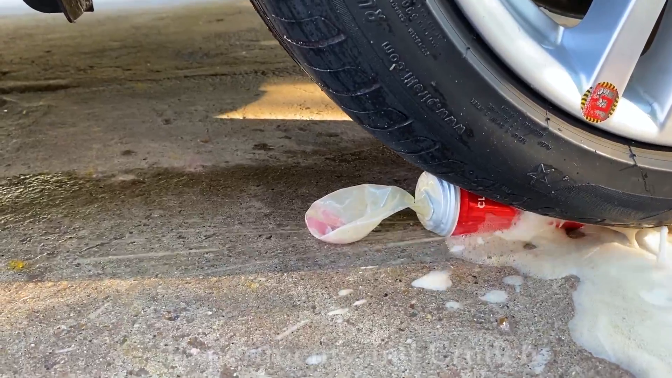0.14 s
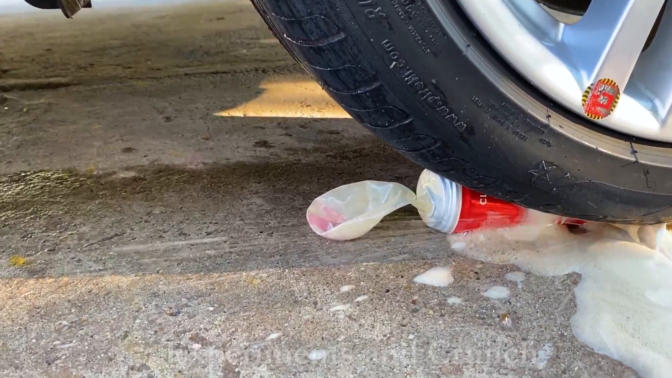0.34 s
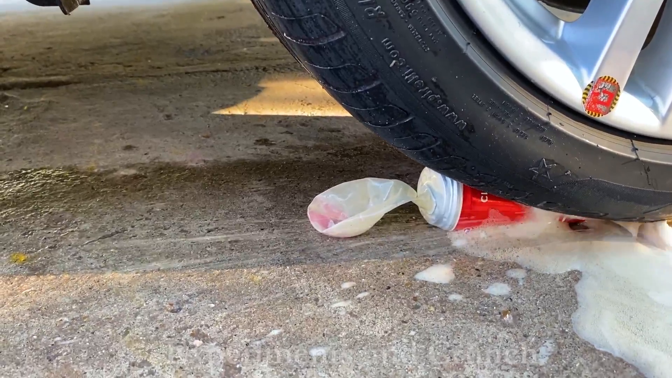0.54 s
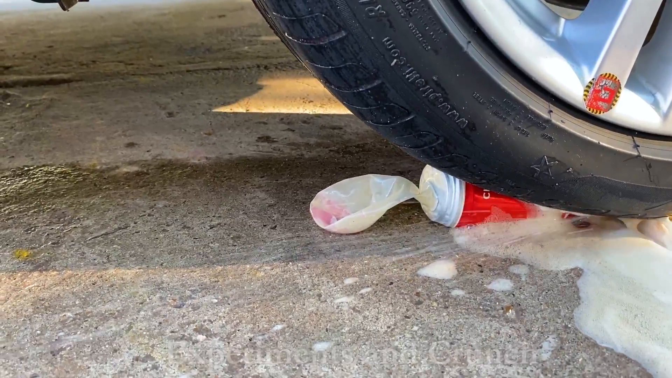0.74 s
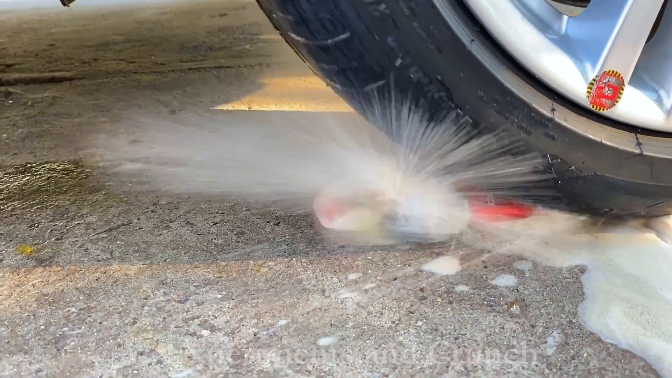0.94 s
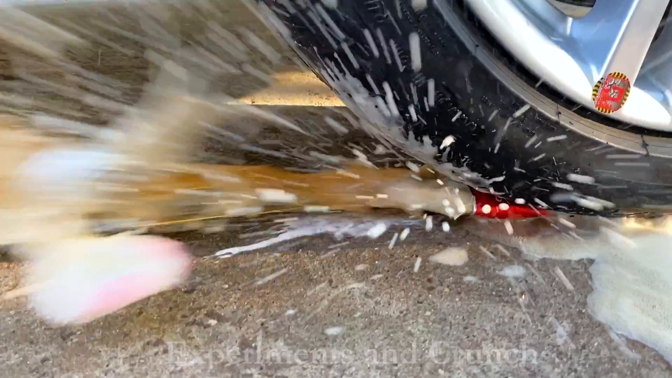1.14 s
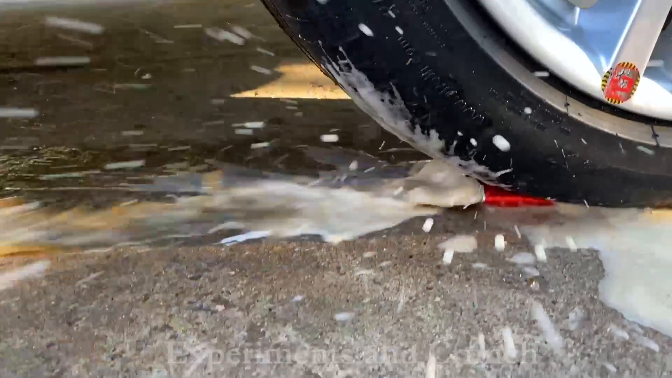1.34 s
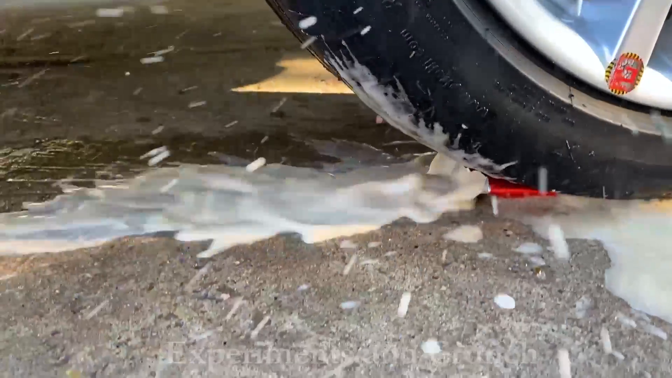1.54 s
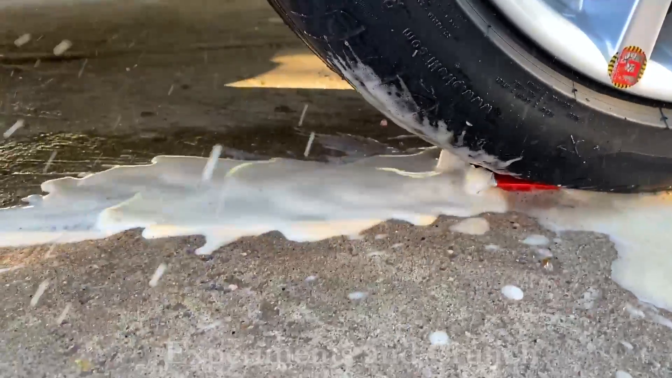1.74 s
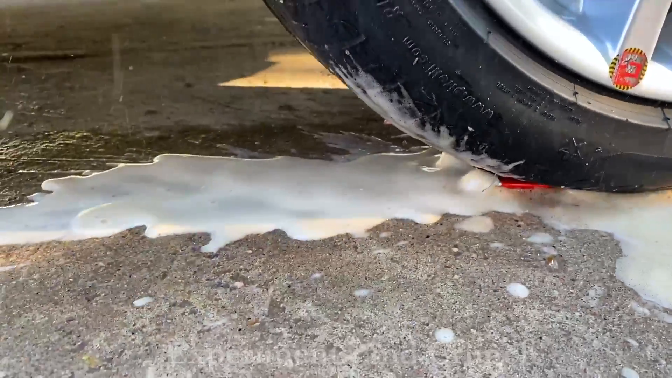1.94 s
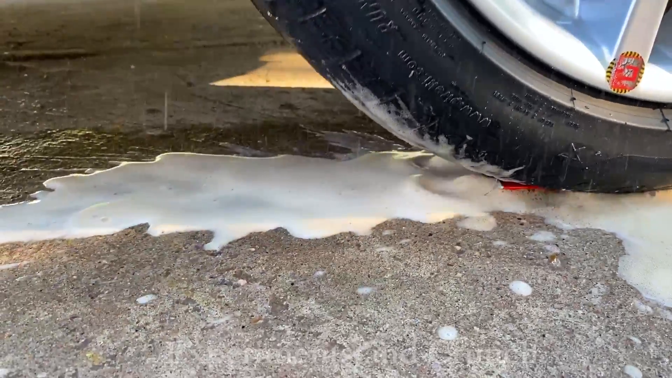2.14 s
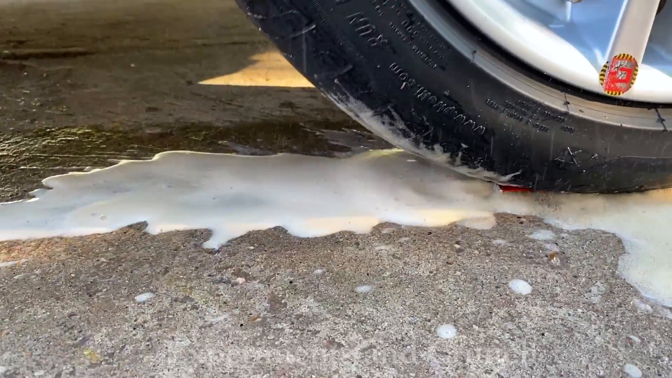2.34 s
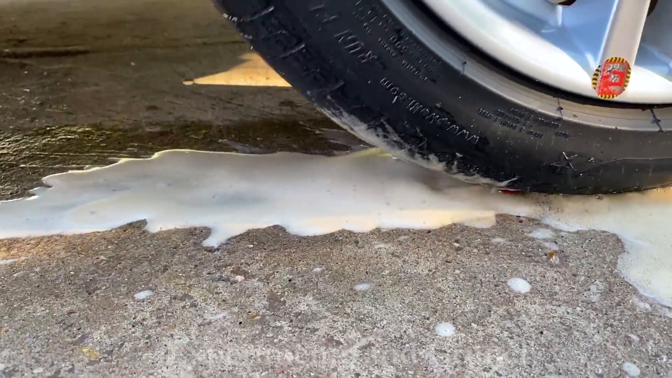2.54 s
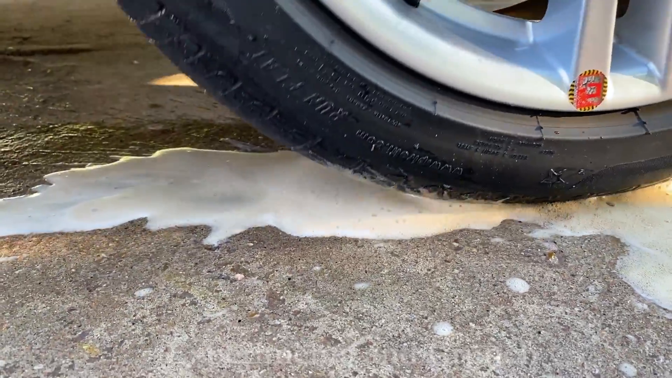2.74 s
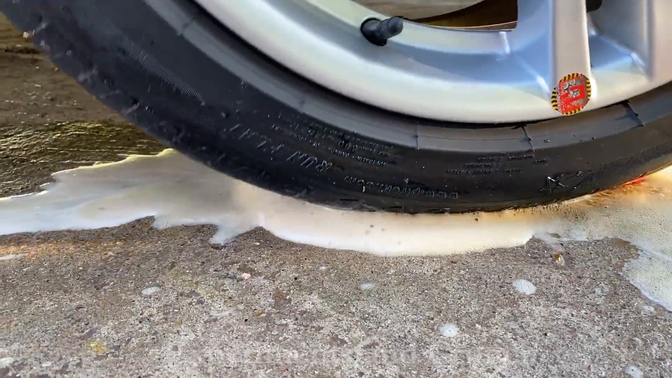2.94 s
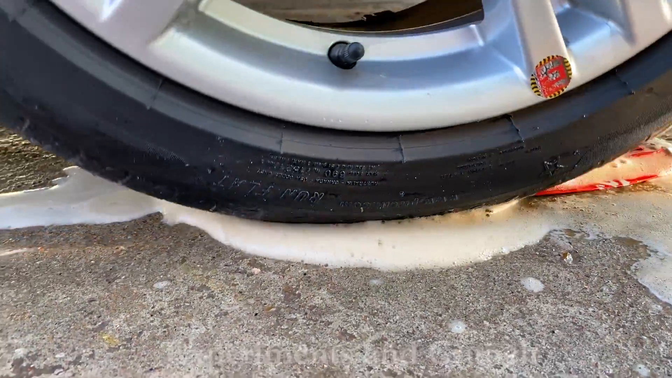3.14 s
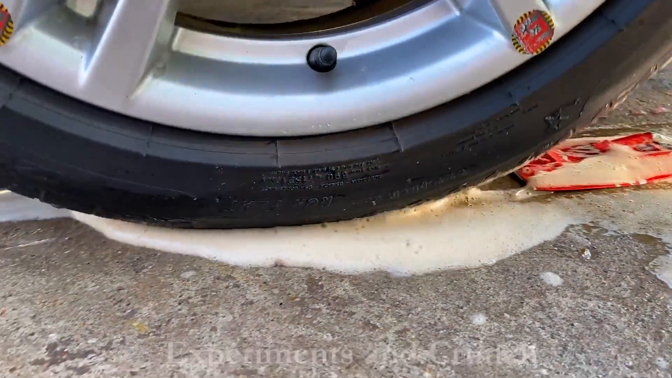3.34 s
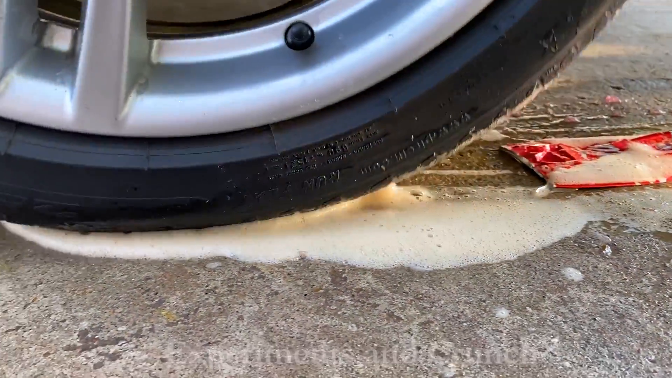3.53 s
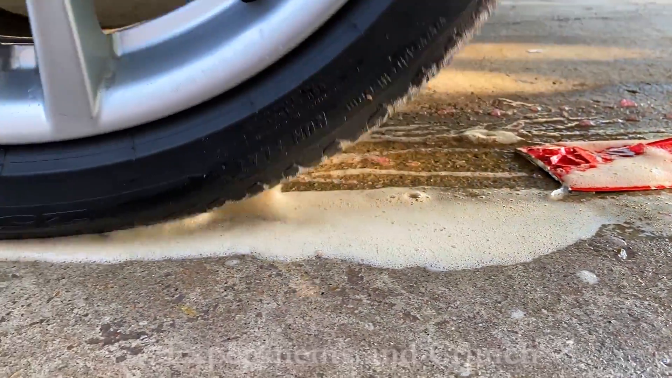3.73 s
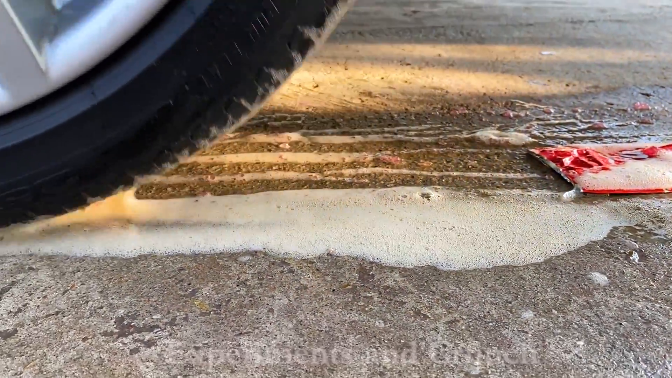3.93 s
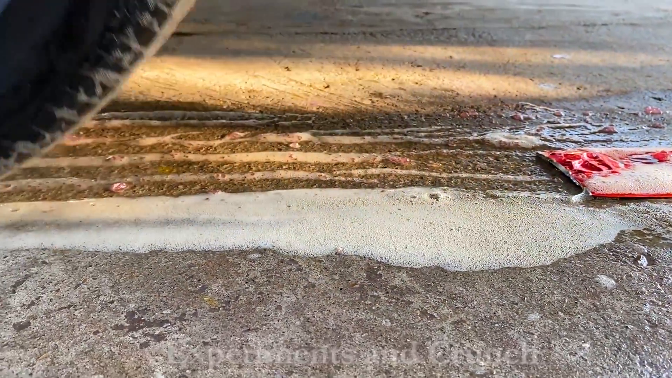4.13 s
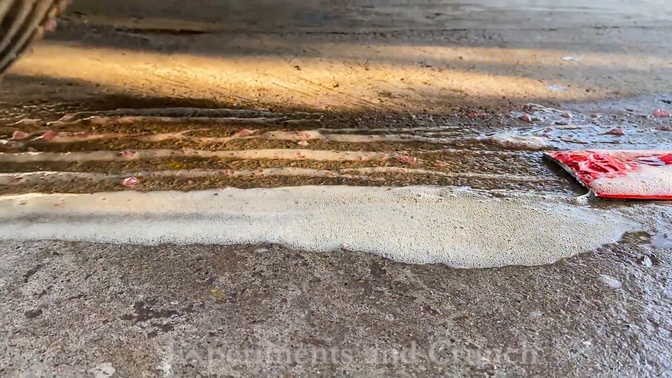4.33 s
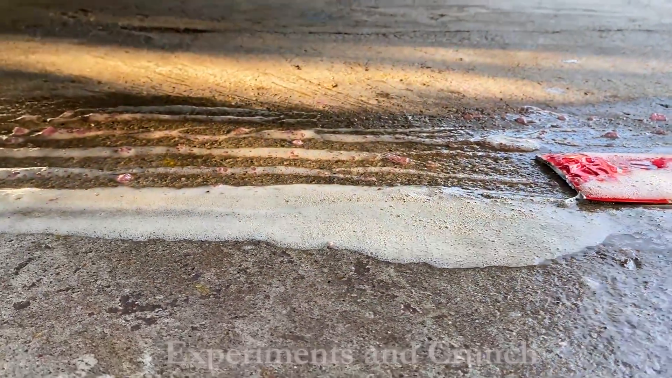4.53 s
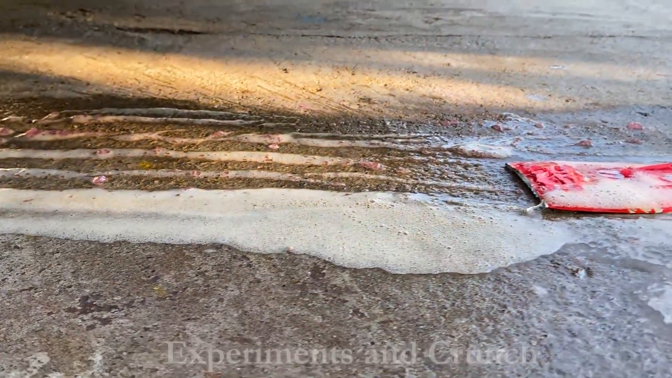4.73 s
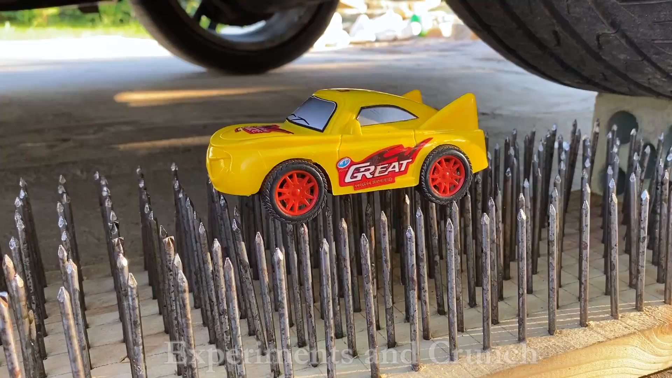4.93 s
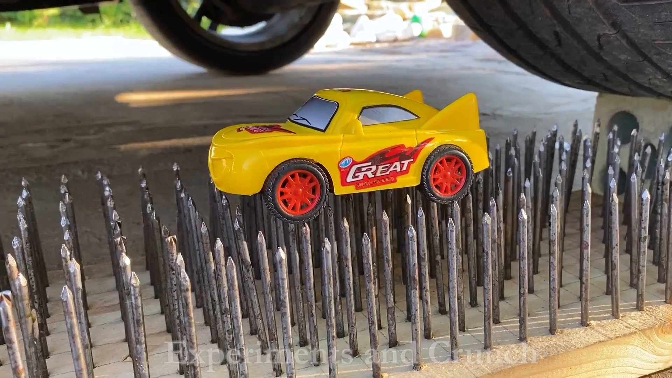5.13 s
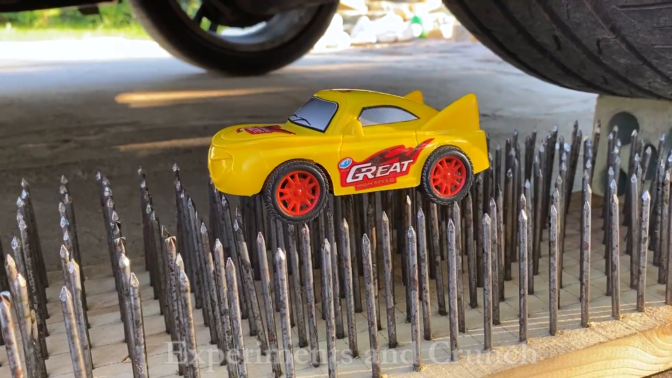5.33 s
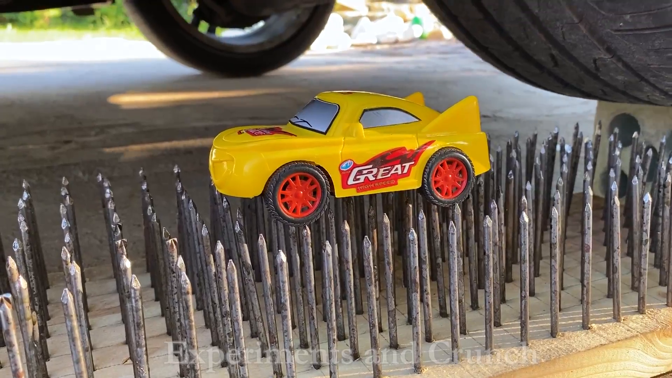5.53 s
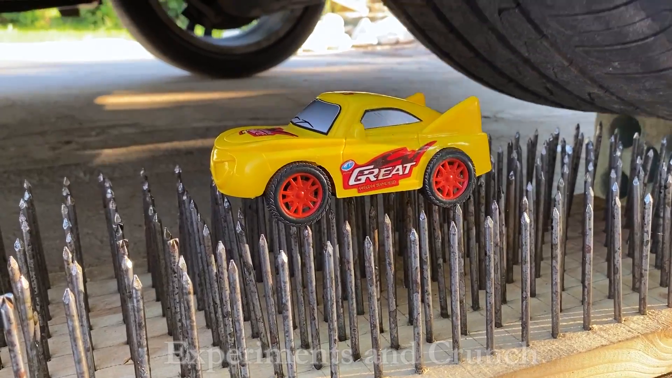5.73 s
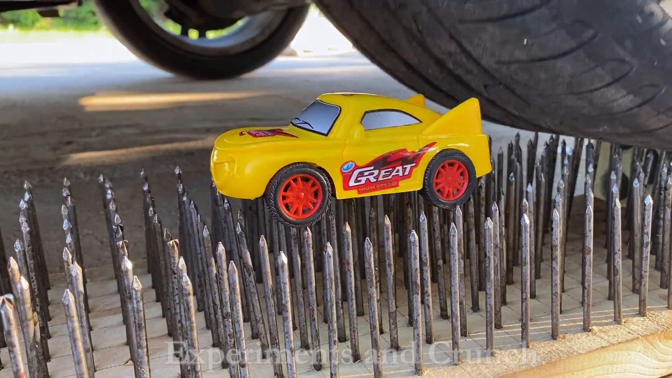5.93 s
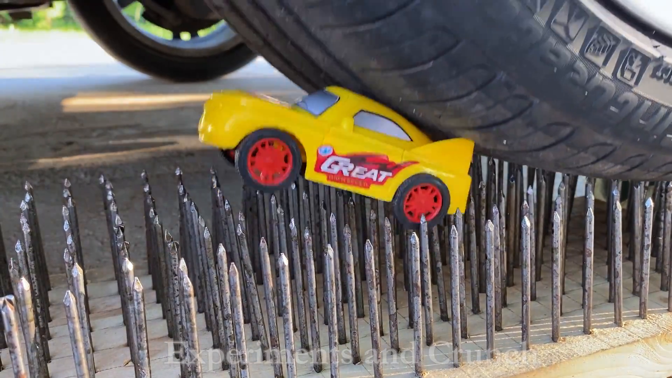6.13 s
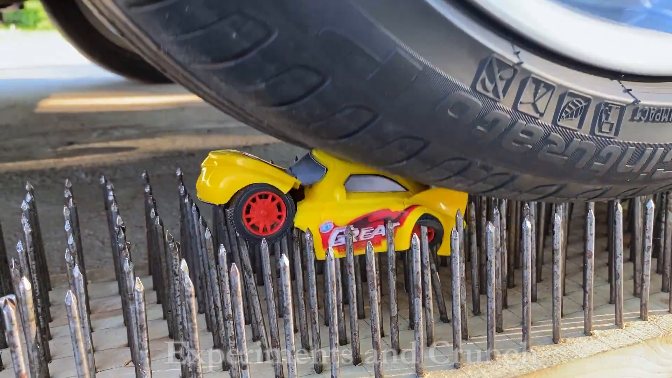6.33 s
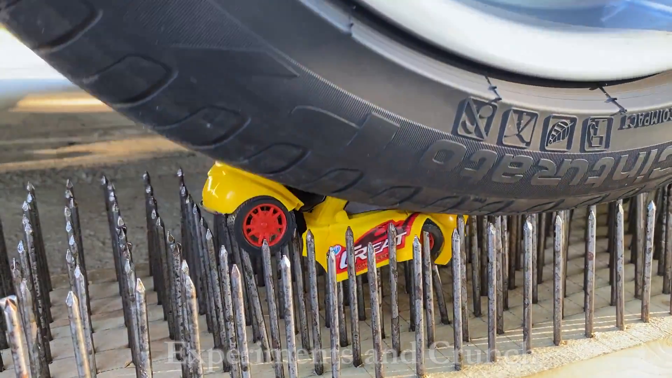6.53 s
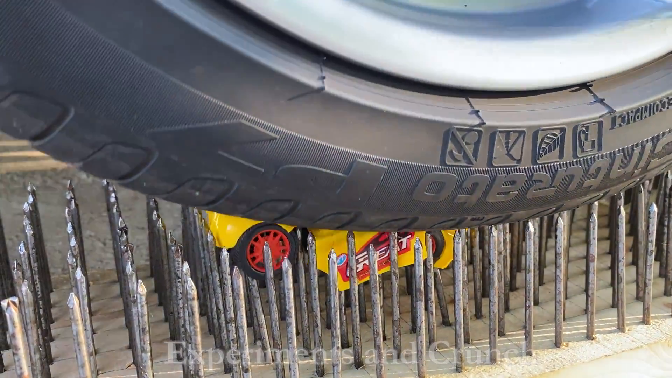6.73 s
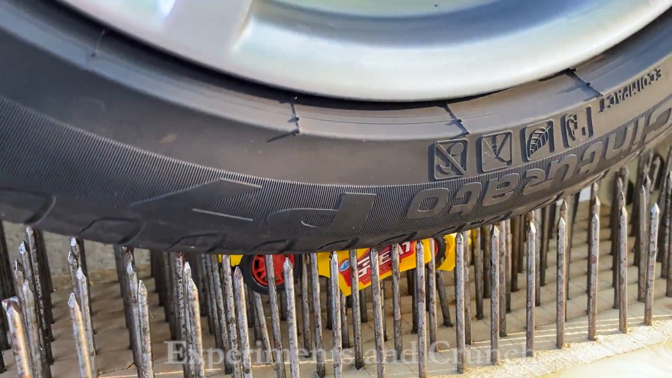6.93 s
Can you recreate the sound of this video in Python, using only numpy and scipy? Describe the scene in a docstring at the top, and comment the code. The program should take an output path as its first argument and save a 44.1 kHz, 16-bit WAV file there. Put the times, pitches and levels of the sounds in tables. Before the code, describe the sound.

A leaking can bursts with a deep slow-motion pop, a car rolls quietly past, then brittle plastic crunches on nails before a heavy tyre thud.

```python
"""In slow motion a drink can under a creeping car tyre hisses (shaped noise), tears (fluttering resonances),
bursts (fractures and a falling thump) and spatters foam, over a slowed engine rumble.
At normal speed an engine idles (harmonics of its firing rate, pulsing noise) as the flat can ticks under the tread.
Then, closer to the engine, a plastic toy on a board of nails cracks and grinds (resonated slips);
it gives way, and the tyre drops and rings (decaying cavity modes)."""
import sys
import numpy as np
from scipy import signal
from scipy.fft import rfft, irfft, next_fast_len
from scipy.io import wavfile

SR = 44100
rng = np.random.default_rng(int(sys.argv[2]) if len(sys.argv) > 2 else 0)


def transcribe(u):
    """Save the signal u as a 16-bit wav file named by the first command-line argument.

    u: samples, shape (n,) or (channels, n), limited to [-1, 1]; the rate is SR.
    q: integer samples, one column per channel.
    """
    v = np.clip(np.atleast_2d(u).T, -1, 1)
    q = np.round(v * 32767).astype(np.int16)
    wavfile.write(sys.argv[1], SR, q)


N = 307377
TIME_S = np.arange(N) / SR

SLOW_SPEED, SLOW_END_S, TOY_START_S = .3, 2.6, 4.996
BURST_S, SPLIT_S, DROP_S = 1.053, 6.313, 6.8535   # can bursts, toy shell splits, toy gives way

# Spectra, slowed: leaking can, engine rumble, air. pitch_hz, relative_db_per_hz
LEAK_SPECTRUM = [(41, -30.5), (70, -5.5), (195, -13.5), (287, -2.5), (471, -5), (620, -2), (870, -8.5),
                 (1130, -15), (1670, -17), (2240, -10), (2500, -9.5), (2890, -4.5), (3610, -16.5),
                 (4250, -14.5), (4750, -28.5), (5600, -16), (7280, -56.5), (12300, -120)]
RUMBLE_SPECTRUM = [(14, -3.5), (30, -7.5), (42, -3.5), (60, -12.5), (200, -23.5)]
SLOW_AIR_SPECTRUM = [(59, -50.5), (100, -5.5), (279, 2), (336, -12.5), (717, -8.5), (972, -18.5),
                     (1320, -19), (2540, -21.5), (3110, -16.5), (3550, -34), (4210, -19.5), (4730, -36),
                     (5600, -28.5), (7280, -48.5), (12300, -120)]
AIR_DB, RUMBLE_DB, SLOW_HUM_DB = -53, -49, -46

# Dips of the background after loud blows, sinking gradually, then recovering steadily: start_s, depth_db
BACKGROUND_DIPS = [(1.06, 16), (6.19, 7), (6.375, 16.5), (6.66, 7.5), (6.853, 17)]
SINK_S, RECOVER_DB_PER_S = 0.096, 62   # at speed 1

# Engine firing rate: time_s, rate_hz
FIRING_RATE = [(2.6, 23.6), (3.5, 22.7), (4.99, 22.7), (5.07, 23.2), (5.3, 24.3), (5.8, 23.5), (6.97, 23.3)]
# Exhaust harmonics beside the can, then the toy: firing_rate_multiple, relative_db
CAN_ORDERS = [(1, -15), (2, -4), (3, 0.5), (4, 0.5), (5, -1.5), (6, -9), (7, -21), (8, -21.5), (9, -21),
              (10, -13.5), (11, -35), (12, -21.5)]
TOY_ORDERS = [(1, -12), (2, -1.5), (3, -1.5), (4, 0.5), (5, -10), (6, -11), (7, -17), (8, -12), (9, -9.5),
              (10, -2), (11, -14), (12, -15.5)]
# Belts, valves and fan beside the can, then the toy: pitch_hz, relative_db_per_hz
CAN_CLATTER_SPECTRUM = [(180, -2), (300, 1), (476, -6.5), (535, -1.5), (892, -10), (1000, -13),
                        (1050, -11.5), (2070, -6.5), (2740, -8.5), (3020, -16), (6900, -22), (8420, -24),
                        (10300, -19), (12100, -29), (15500, -27)]
TOY_CLATTER_SPECTRUM = [(180, -18), (300, -3.5), (446, -4), (937, -12), (1020, -12.5), (1280, -13),
                        (1370, -13.5), (2210, -5.5), (3020, -19), (6790, -24.5), (8280, -29), (10400, -24),
                        (12100, -41), (13400, -33), (15500, -43)]
# Engine bay resonances: pitch_hz, width_hz, relative_db
BAY_RESONANCES = [(92, 37, 1.5), (227.7, 34.6, -2), (281.3, 10.5, -0.5), (2180, 56, -17.5)]
CAN_EXHAUST_DB, CAN_CLATTER_DB = -50, -54.5   # at the end of the slow motion
EXHAUST_DB_PER_S, CLATTER_DB_PER_S = 2.5, -2   # rolling past the can: exhaust nears, engine bay recedes
TOY_EXHAUST_DB, TOY_CLATTER_DB = -35.5, -44.5
WHINE_HZ = 994

# Nail board resonances: pitch_hz, width_hz, relative_db
BOARD_RESONANCES = [(80, 8.5, 2), (137, 44, -10.5), (513, 120, -24.5)]
BOARD_DB = -27

# Heavy drops landing, slowed; played 0.5 dB up: start_s, level_db
DROP_THUDS = [(1.67, -55), (1.946, -44), (2.106, -49.5), (2.34, -46.5), (2.416, -46)]
# Foam and scraps slapping down, slowed; body played 0.5 dB up: start_s, level_db, t60_s
FOAM_SPLASHES = [(1.8509, -39.5, 0.062), (1.8655, -41.5, 0.087), (1.8845, -43.5, 0.071), (1.896, -43, .17),
                 (1.946, -48, 0.11), (2.416, -38, .018)]
SPLASH_SNAP_DB, SNAP_DB_PER_S = -2.5, -55   # treble against level_db; longer splashes are duller

# Flat can, then wet grit, under the tread: start_s, level_db, t60_s
TREAD_TICKS = [(2.6423, -52, .035), (2.6656, -40, 0.0092), (2.733, -48, 0.031), (2.8806, -52.5, .046),
               (2.9, -49, .058), (2.933, -57, 0.03), (3.065, -47, 0.031), (3.1707, -55, .03),
               (3.272, -52.5, 0.094), (3.371, -55.5, 0.058)]
CAN_END_S, METAL_SNAP_DB, GRIT_SNAP_DB = 3.0, 0.5, -15   # ticks turn dull once the tread leaves the can
FIZZ_DB = -67.5

# Tyre air cavity: pitch_hz, level_db, t60_s
CAVITY_MODES = [(221, -34, 1.1), (426, -36, .45), (625, -37, .2), (872, -44, .14)]

# Toy cracks; the piece's ring plays 1 dB up: start_s, piece_pitch_hz, level_db
TOY_CRACKS = [(6.1078, 1152, -27.5), (6.114, 1250, -32.5), (6.149, 1450, -35), (6.157, 1180, -30),
              (6.1764, 1600, -23.5), (6.1791, 990, -21.5), (6.1821, 1400, -20.5), (6.1852, 2000, -17.5),
              (6.2083, 2300, -33.5), (6.2126, 1330, -30), (6.236, 1270, -33), (6.2716, 1420, -24.5),
              (6.2855, 1630, -32.5), (6.303, 1720, -22.5), (6.3116, 2920, -29), (6.3146, 2720, -25),
              (6.33, 2630, -28), (6.3337, 2120, -25.5), (6.3675, 4500, -54), (6.3755, 2660, -45),
              (6.381, 3000, -30.5), (6.3852, 1730, -22.5), (6.4132, 2300, -32.5), (6.4471, 2830, -39.5),
              (6.4728, 3400, -43), (6.4908, 4830, -45.5), (6.5369, 2840, -28.5), (6.5767, 2430, -41),
              (6.6068, 1900, -41), (6.6596, 3440, -32), (6.8013, 3830, -41), (6.8466, 3840, -37.5),
              (6.8527, 2530, -24.5), (6.9255, 2880, -49.5), (6.9373, 3630, -46)]
# Plastic shell resonances: pitch_hz, width_hz, relative_db
SHELL_RESONANCES = [(970, 135, 5.5), (1110, 44, 1.5), (1280, 85, 5.5), (1578, 76, 4), (1923, 64, -2),
                    (2160, 140, -0.5), (2260, 110, 1), (2700, 350, 2), (3095, 190, -0.5)]
PIECE_REF_HZ = 2000
THUD_DB, THUD_DB_PER_OCTAVE = -4.5, -0.5   # against level_db, piece at PIECE_REF_HZ; small pieces thud less
BUCKLE_SNAP_DB, SPLIT_SNAP_DB = -11.5, -3.5   # splinters against level_db, before and after the split
SNAP_DB_PER_OCTAVE = 4.5   # small pieces snap more
GRIND_DB = -33.5

# Torn can wall resonances: pitch_hz, width_hz, relative_db
TEAR_RESONANCES = [(285, 44, 6), (362, 130, 1.5), (779, 62, -1), (1350, 110, -16), (1800, 170, -11),
                   (2270, 200, -11), (3000, 700, -29.5)]
LEAK_DB, SPRAY_DB, SPRAY_T60_S = -36, -59.5, .38   # jet before the burst, spray after
TEAR_DB, TEAR_S = -14.5, 0.025   # tear before weighting; time at full strength

# Microphone stop bands at normal speed: low_hz, high_hz
MIC_STOP_BANDS = [(11700, 12400), (15600, 16400)]
CUTOFF_HZ = 16000


def from_db(db):
    """Decibels to gain."""
    return 10 ** (np.asarray(db) / 20)


def rms_one(x):
    """Scale to rms 1."""
    return x / np.sqrt(np.mean(x ** 2) + 1e-20)


def cut(x, hz, kind, order=2):
    """Butterworth filter."""
    sos = signal.butter(order, np.clip(hz, 10, .45 * SR), kind, fs=SR, output="sos")
    return signal.sosfilt(sos, x + 1e-18)


def band(low_hz, high_hz, order=2):
    """A band-pass colour."""
    return lambda x: cut(x, [low_hz, high_hz], "band", order)


def noise(spectrum):
    """Noise of a given spectrum, falling steeply past its ends; rms 1."""
    hz, db = np.transpose(spectrum)
    size = next_fast_len(N)
    f = np.maximum(np.arange(size // 2 + 1) * SR / size, 1)
    ends = np.minimum(1, np.minimum(f / hz[0], hz[-1] / f)) ** 2
    gain = from_db(np.interp(np.log(f), np.log(hz), db)) * ends
    return rms_one(irfft(rfft(rng.standard_normal(size)) * gain, size)[:N])


def drift(rate_hz):
    """Slow random wander: straight lines between random knots of spread 1."""
    knots = rng.standard_normal(1024)
    return np.interp(TIME_S * rate_hz, np.arange(len(knots)), knots)


def resonate(x, modes):
    """Parallel two-pole resonances of alternating sign."""
    out = 0
    for k, (hz, width_hz, db) in enumerate(modes):
        r = np.exp(-np.pi * width_hz / SR)
        b = (1 - r * r) / 2 * np.array([1, 0, -1])
        a = [1, -2 * r * np.cos(2 * np.pi * hz / SR), r * r]
        out = out + (-1) ** k * from_db(db) * signal.lfilter(b, a, x + 1e-18)
    return out


def envelope(start_s, end_s, attack_s, t60_s):
    """Full level from start to end; rises 60 dB during the attack before, falls 60 dB per t60 after."""
    early_s = np.maximum(start_s - TIME_S, 0)
    late_s = np.maximum(TIME_S - end_s, 0)
    return from_db(-60 * np.minimum(early_s / attack_s + late_s / t60_s, 4))


def add(out, start_s, sound):
    """Mix a sound in at its start time."""
    i = int(start_s * SR)
    out[i:i + len(sound)] += sound[:N - i]


def fracture(level_db, colour, t60_s, tail_db, tail_t60_s):
    """Dying shower of tiny slips, then scatter from ground and car body; energy set as rms over 10 ms."""
    t = TIME_S[:SR // 4]
    slips, scatter = rng.standard_normal((2, len(t)))
    shower = slips * from_db(-60 * t / t60_s)
    tail = scatter * from_db(tail_db - 60 * t / tail_t60_s)
    burst = colour(shower + tail)
    return from_db(level_db) * burst / np.sqrt(np.sum(burst ** 2) / (SR / 100))


def thump(start_s, level_db, start_hz, end_hz, glide_s, rise_s, t60_s):
    """Sudden release of pressure: a few swings that slow down as they die."""
    t = np.maximum(TIME_S - start_s, 0)
    cycles = end_hz * t + (start_hz - end_hz) * glide_s * (1 - np.exp(-t / glide_s))
    decay = from_db(level_db - 60 * np.minimum(t / t60_s, 4))
    return decay * (1 - np.exp(-t / rise_s)) * -np.sin(2 * np.pi * cycles)


def dips(speed):
    """Background gain: sinks gradually after each loud blow, recovers steadily; lower speed stretches both."""
    depth_db = np.zeros(N)
    for start_s, db in BACKGROUND_DIPS:
        t = (TIME_S - start_s) * speed
        sinking = db * t / SINK_S
        recovering = db - RECOVER_DB_PER_S * (t - SINK_S)
        depth_db = np.maximum(depth_db, np.minimum(sinking, recovering))
    return from_db(-depth_db)


def slow_surroundings():
    """Slowed, the engine is a rumble and the tyre cavity a deep hum; the burst echoes under the car."""
    background = dips(SLOW_SPEED)
    echo = envelope(BURST_S, BURST_S, attack_s=.01, t60_s=.3)
    buffeting = envelope(0, BURST_S, attack_s=.01, t60_s=.2)   # the jet adds to the rumble
    air = from_db(AIR_DB) * background + from_db(-41.5) * echo
    rumble = from_db(RUMBLE_DB) * background + from_db(-47) * buffeting + from_db(-25.5) * echo
    exhaust = np.sin(2 * np.pi * 28.7 * TIME_S)
    throb = 0.78 * noise(RUMBLE_SPECTRUM) + 0.69 * exhaust * from_db(3 * drift(9))
    cavity = np.sqrt(2) * np.sin(2 * np.pi * 64.6 * TIME_S) * from_db(.8 * drift(8))
    hum = from_db(SLOW_HUM_DB) * background ** 0.83 * cavity   # dips a little less
    return air * noise(SLOW_AIR_SPECTRUM) + rumble * throb + hum


def engine(exhaust_db, clatter_db, orders, clatter_spectrum, waver_db, stagger, beat, bay_db, whine_db):
    """Firings give a harmonic exhaust drone and pulse the mechanical clatter; a thin whine runs beside."""
    turn = 2 * np.pi * np.cumsum(np.interp(TIME_S, *np.transpose(FIRING_RATE))) / SR
    drone = 0
    for k, db in orders:
        level = from_db(db + waver_db * drift(14))
        # the pipe delays high harmonics, smearing each puff; no two puffs are quite alike
        drone = drone + level * np.cos(k * turn - .6 * k * k + stagger * k * drift(14))
    bay = from_db(bay_db) * rms_one(resonate(rng.standard_normal(N), BAY_RESONANCES))
    clatter = (1 + beat * np.cos(turn)) * noise(clatter_spectrum)
    whine_level = from_db(whine_db + 1.5 * drift(10))
    whine = whine_level * np.sin(2 * np.pi * WHINE_HZ * TIME_S + .6 * drift(20))
    return from_db(exhaust_db) * (rms_one(drone) + bay) + from_db(clatter_db) * (clatter + whine)


def tyre_hum():
    """Tyre air sounds faintly on flat ground, louder while the tread is pressed on the can or the toy."""
    on_can = from_db(-51.5) * envelope(SLOW_END_S, 2.606, attack_s=.01, t60_s=1.0)
    on_toy = from_db(-48.0) * envelope(6.5, DROP_S, attack_s=18, t60_s=.1) * (TIME_S >= TOY_START_S)
    level = from_db(-67.5) + on_can + on_toy
    tone = np.sqrt(2) * np.sin(2 * np.pi * 218 * TIME_S + 0.8 * drift(10))
    return level * tone * from_db(1.6 * drift(11))


def nail_board():
    """The board groans as it takes the load: noise through its resonances."""
    groan = rms_one(resonate(rng.standard_normal(N), BOARD_RESONANCES))
    return from_db(BOARD_DB) * envelope(5.27, 5.325, attack_s=0.42, t60_s=0.22) * groan


def spatter():
    """Drops and scraps land, drawn out and lowered by the slow motion."""
    out = np.zeros(N)
    for start_s, db in DROP_THUDS:
        add(out, start_s, fracture(db + .5, band(117, 267), t60_s=0.082, tail_db=-31, tail_t60_s=0.18))
    for start_s, db, t60_s in FOAM_SPLASHES:
        snap_db = db + SPLASH_SNAP_DB + SNAP_DB_PER_S * t60_s
        body = fracture(db + .5, band(460, 1600, order=3), t60_s, tail_db=-24, tail_t60_s=0.21)
        snap = fracture(snap_db, band(1900, 3350), 0.78 * t60_s, tail_db=-21.0, tail_t60_s=0.17)
        add(out, start_s, body)
        add(out, start_s, snap)
    return out


def flat_can():
    """Thin metal and grit tick under the tread as short fractures; the foam fizzes faintly."""
    out = np.zeros(N)
    for start_s, db, t60_s in TREAD_TICKS:
        snap_db = db + (METAL_SNAP_DB if start_s < CAN_END_S else GRIT_SNAP_DB)
        add(out, start_s, fracture(db, band(1270, 4300), t60_s, tail_db=-24, tail_t60_s=.08))
        add(out, start_s, fracture(snap_db, band(5400, 10600), t60_s, tail_db=-28, tail_t60_s=0.09))
    bubbles = rng.random(N) < 200 / SR   # 200 per second on average
    grains = bubbles * rng.standard_normal(N) * from_db(3.6 * drift(40))
    fizz = rms_one(resonate(grains, [(4200, 880, 4), (5660, 700, -1), (9800, 3400, -6)]))
    return out + from_db(FIZZ_DB) * envelope(2.92, 3.12, attack_s=1.4, t60_s=3.3) * fizz


def tyre_drop():
    """The toy gives way: the tyre drops onto the board and its air cavity rings."""
    t = np.maximum(TIME_S - DROP_S, 0)
    ring = sum(from_db(db - 60 * t / t60_s) * np.sin(2 * np.pi * hz * t) for hz, db, t60_s in CAVITY_MODES)
    knock = fracture(-20.5, band(510, 716), t60_s=0.035, tail_db=-21, tail_t60_s=0.18)   # board
    add(ring, DROP_S, knock)
    return ring + thump(DROP_S, level_db=0, start_hz=720, end_hz=145, glide_s=0.0034, rise_s=0.0021,
                        t60_s=0.0283)


def toy():
    """The shell grinds, cracks and splits: each piece rings at its pitch; smaller pieces snap brighter."""
    out = np.zeros(N)
    for start_s, hz, db in TOY_CRACKS:
        before_split = start_s < SPLIT_S
        octaves = np.log2(hz / PIECE_REF_HZ)
        thud_db = db + THUD_DB + THUD_DB_PER_OCTAVE * octaves
        snap_db = db + (BUCKLE_SNAP_DB if before_split else SPLIT_SNAP_DB) + SNAP_DB_PER_OCTAVE * octaves
        # the piece rings briefly at its own pitch and wakes the nearest shell modes most
        shell = [(f, width_hz, mode_db - 7 * abs(np.log2(f / hz)) + rng.normal(0, 4.7))
                 for f, width_hz, mode_db in SHELL_RESONANCES]
        piece = lambda x: resonate(x, shell) + from_db(4.0) * resonate(x, [(hz, 0.33 * hz, 0)])
        # splinter pitches differ from crack to crack; small, loose pieces favour the highest
        tilt_db_per_octave = 4.8 * octaves - (1.5 if before_split else 0)
        splinters = [(f * np.exp(rng.normal(0, 0.053)), 1100, mode_db + tilt_db_per_octave * np.log2(f / 8000))
                     for f, mode_db in [(5000, -3), (6600, -1.0), (9300, 2.5), (10400, 1.0), (13300, -5.5)]]
        splinter = lambda x: resonate(x, splinters)
        add(out, start_s, fracture(thud_db, band(164, 700), t60_s=0.021, tail_db=-15.5, tail_t60_s=0.11))
        add(out, start_s, fracture(db + 1, piece, t60_s=0.016, tail_db=-19.0, tail_t60_s=0.094))
        add(out, start_s, fracture(snap_db, splinter, t60_s=0.014, tail_db=-16.5, tail_t60_s=0.076))
    # plastic grinds on the nails until the shell has buckled
    slips = (rng.random(N) < 1500 / SR) * rng.standard_normal(N) * from_db(3.0 * drift(120))
    shell_grind = cut(resonate(slips, SHELL_RESONANCES), 1800, "low", order=1)
    scrape = 0.11 * cut(slips, [500, 10000], "band")
    grind = rms_one(shell_grind + scrape)
    return out + from_db(GRIND_DB) * envelope(6.137, 6.195, attack_s=0.12, t60_s=0.23) * grind


def can_burst():
    """The leak hisses, the wall flutters and tears, then the can lets go with a crack and a boom."""
    jet = from_db(LEAK_DB) * envelope(0, BURST_S, attack_s=.01, t60_s=.055)
    spray = from_db(SPRAY_DB) * envelope(BURST_S, BURST_S, attack_s=.01, t60_s=SPRAY_T60_S)
    leak = (jet + spray) * noise(LEAK_SPECTRUM) * from_db(.5 * drift(40))
    flutter = np.sin(2 * np.pi * np.cumsum(280 * (1 + .05 * drift(150))) / SR)
    rip = rms_one(resonate(rng.standard_normal(N) * (1 + .6 * flutter), TEAR_RESONANCES))
    tear = from_db(TEAR_DB) * envelope(BURST_S - TEAR_S, BURST_S, attack_s=.066, t60_s=.014)
    out = leak + tear * (.95 * flutter + .62 * rip)
    crack = fracture(-24.5, band(1800, 4500), t60_s=.012, tail_db=-36.5, tail_t60_s=.15)
    buckle = fracture(-20.5, band(480, 800), t60_s=.02, tail_db=-29.5, tail_t60_s=.15)
    add(out, BURST_S, crack)
    add(out, BURST_S, buckle)
    return out + thump(1.0543, level_db=2.3, start_hz=293, end_hz=69.4, glide_s=0.0075, rise_s=0.00099,
                       t60_s=0.039)


def microphone(x, speed):
    """Rounded peaks and treble notches; slow motion carries the notches down with everything else."""
    ceiling = 0.78
    x = ceiling * np.tanh(x / ceiling)
    x = x - .75 * resonate(x, [(8450 * speed, 800 * speed, 0)])
    x = x - 1.1 * resonate(x, [(12050 * speed, 1000 * speed, 0)])
    for stop_hz in MIC_STOP_BANDS:
        x = cut(x, np.array(stop_hz) * speed, "stop", order=3)
    top_hz = 19300 * speed
    return signal.sosfilt(signal.ellip(10, .2, 80, top_hz, fs=SR, output="sos"), x)


def scene():
    """Three passages in a row: the slowed burst, the roll over the flat can, the toy."""
    slowed = (slow_surroundings() + spatter() + can_burst()) * (TIME_S < SLOW_END_S)
    rolled_s = TIME_S - SLOW_END_S
    passing = engine(CAN_EXHAUST_DB + EXHAUST_DB_PER_S * rolled_s, CAN_CLATTER_DB + CLATTER_DB_PER_S * rolled_s,
                     CAN_ORDERS, CAN_CLATTER_SPECTRUM, waver_db=3.5, stagger=0.056, beat=0.15,
                     bay_db=-11.0, whine_db=-14)
    close = engine(TOY_EXHAUST_DB, TOY_CLATTER_DB, TOY_ORDERS, TOY_CLATTER_SPECTRUM,
                   waver_db=4.2, stagger=0.063, beat=0.18, bay_db=-3.5, whine_db=-11)
    rolling = passing + flat_can()
    crushing = close * dips(0.85) + nail_board() + tyre_drop() + toy()
    live = np.where(TIME_S < TOY_START_S, rolling, crushing) + tyre_hum()
    live = live * (TIME_S >= SLOW_END_S)
    return (microphone(slowed, SLOW_SPEED) + microphone(live, 1))[None]


def record(dry):
    """Steep low-pass: nothing much is left above the cutoff."""
    return signal.sosfilt(signal.ellip(10, .2, 80, CUTOFF_HZ, fs=SR, output="sos"), dry)


dry = scene()
out = record(dry)
transcribe(out)
```